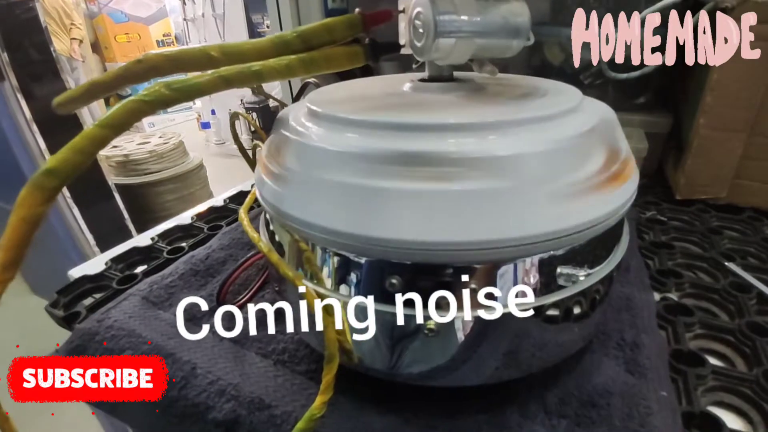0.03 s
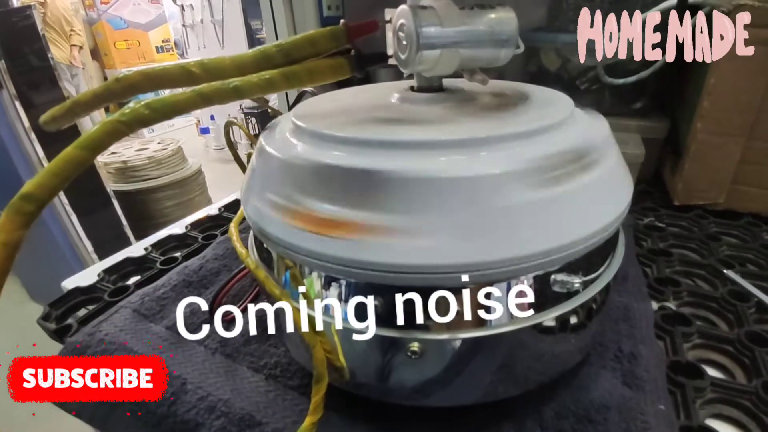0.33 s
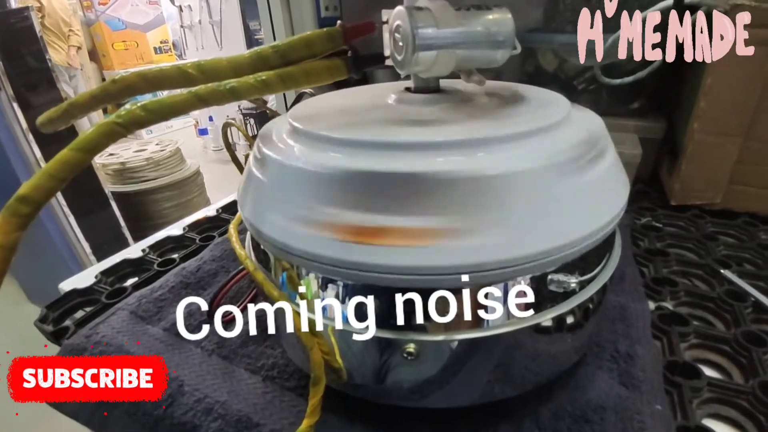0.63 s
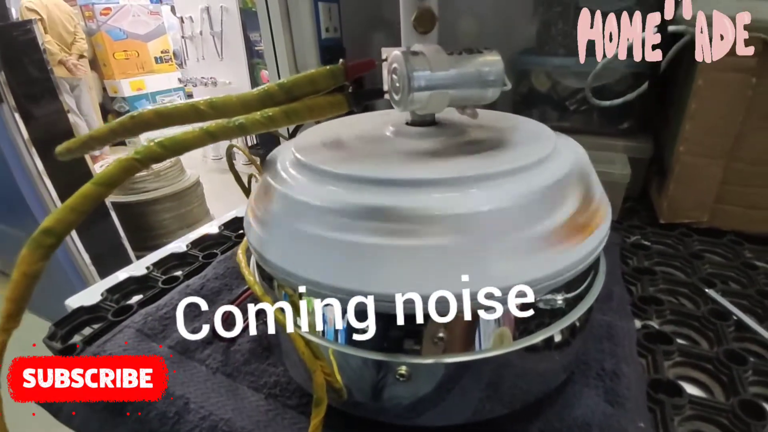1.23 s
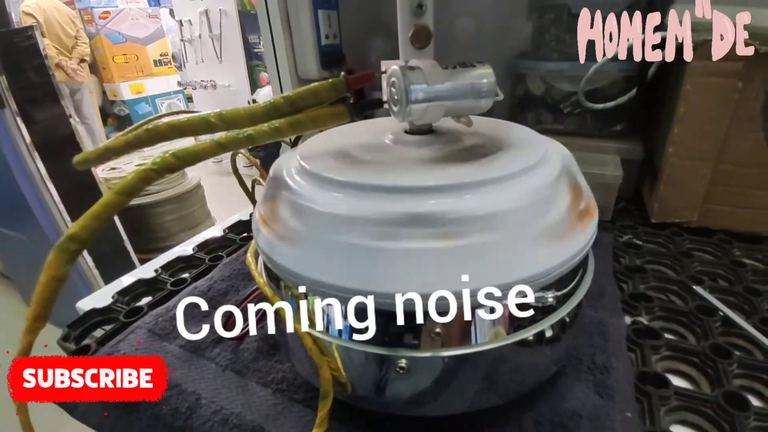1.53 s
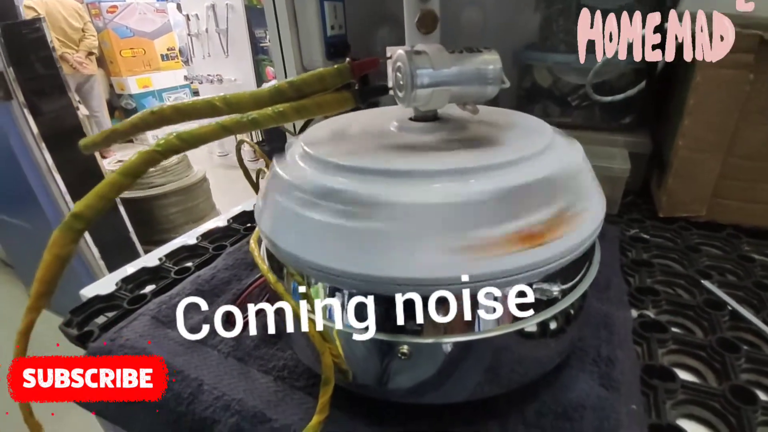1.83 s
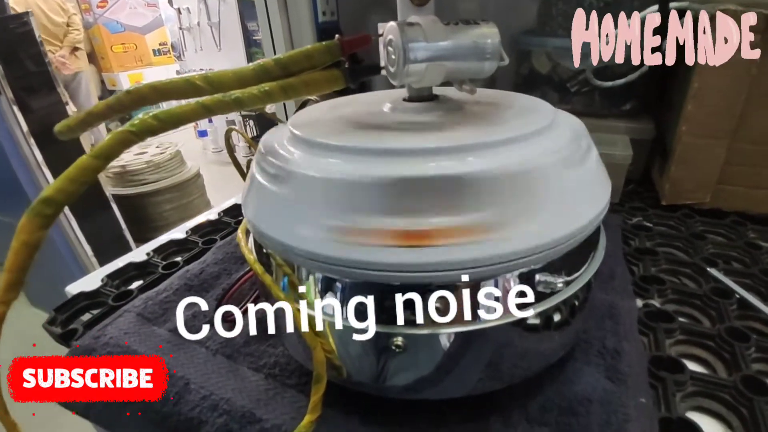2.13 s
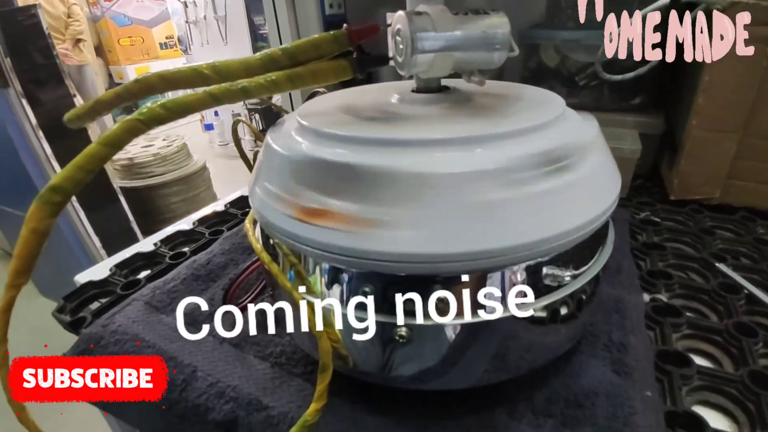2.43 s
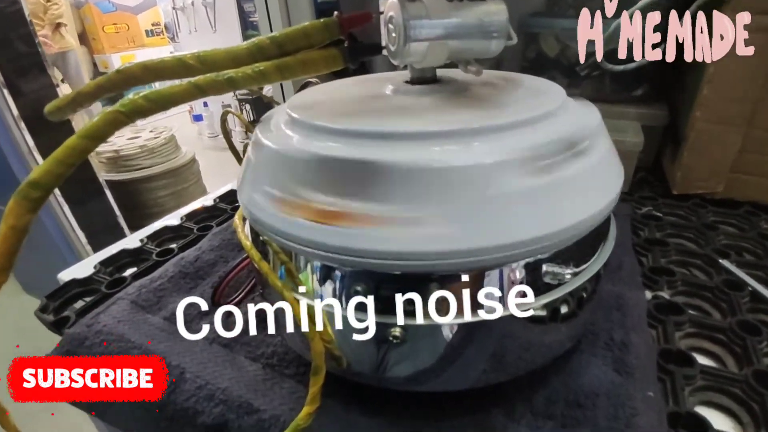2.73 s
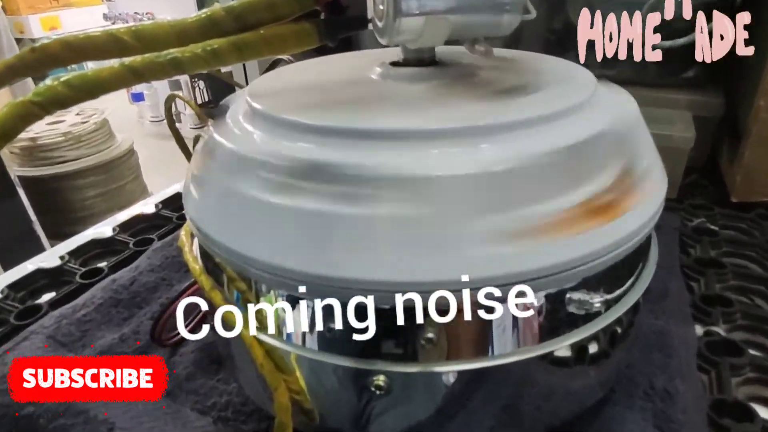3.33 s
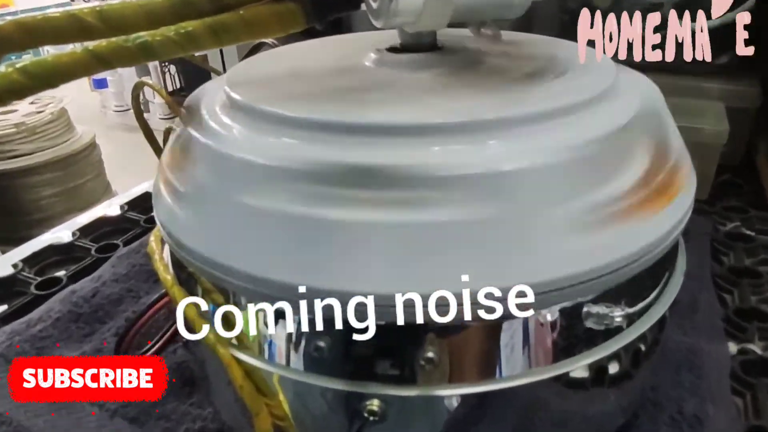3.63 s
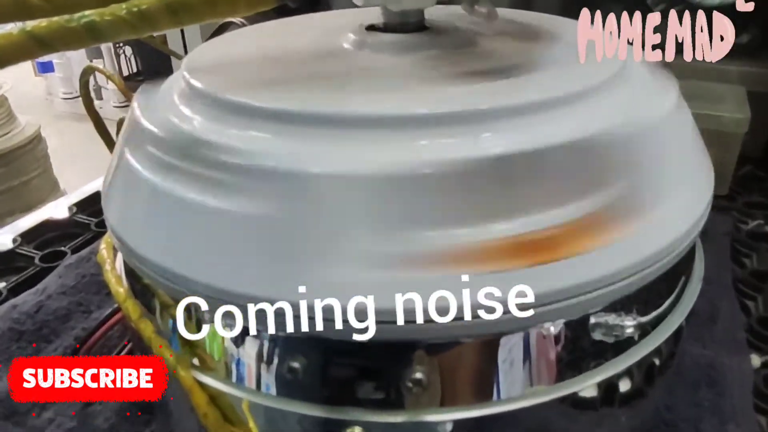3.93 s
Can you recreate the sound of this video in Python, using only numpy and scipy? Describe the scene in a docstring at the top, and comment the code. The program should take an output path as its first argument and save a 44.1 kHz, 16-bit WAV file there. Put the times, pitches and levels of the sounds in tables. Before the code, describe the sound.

A spinning ceiling fan motor rubs with a rough, regularly pulsing metallic rasp.

```python
"""A bare ceiling fan motor on a workshop bench, close to a stereo microphone, at about seven turns a second.
From the start the motor drones over faint room noise. Each turn opens as the warped rotor ticks against
the stator; it then drags over the same rough patch, a rasp that rings in the metal housing, growls below,
squeaks where it grabs and throws off a fine hiss. The rotor skids as it lets go, a loose part rattles on,
and the small room answers before the next turn."""
import sys
import numpy as np
from scipy import signal
from scipy.fft import rfft, irfft
from scipy.io import wavfile
from scipy.ndimage import uniform_filter1d, map_coordinates

SR = 44100
rng = np.random.default_rng(int(sys.argv[2]) if len(sys.argv) > 2 else 0)


def wav_out(sig):
    """Save sig, one row per channel (or a flat mono array), as 16-bit PCM at SR to the path in sys.argv[1]."""
    wavfile.write(sys.argv[1], SR, np.round(np.clip(np.atleast_2d(sig).T, -1, 1) * 32767).astype(np.int16))


N = 176400
TIME = np.arange(N) / SR
TURN_S, FIRST_TURN_S = .14391, .1192
TURN_SIZE = round(TURN_S * SR)
TURN_TIME = np.arange(TURN_SIZE) / SR
GRIT_PER_S, BITE_PER_S = 900, 90   # the friction catches and slips; the contact bites unevenly


def from_db(db):
    """Decibels to gain."""
    return 10 ** (np.asarray(db) / 20)


def rms_one(x):
    """Scale to rms 1."""
    return x / np.sqrt(np.mean(x ** 2) + 1e-20)


def curve(rows, at):
    """Straight lines between the rows."""
    return np.interp(at, *np.transpose(rows))


def at_hz(rows, hz):
    """Straight lines on a log-frequency axis."""
    row_hz, value = np.transpose(rows)
    return np.interp(np.log(hz + 1), np.log(row_hz), value)


def sides(pan_db):
    """A left-right difference as dB for each channel."""
    return pan_db * np.array([[.5], [-.5]])


def drift(per_s, at):
    """A random wander of spread about 1, read at the given times."""
    return np.interp(at * per_s, np.arange(8192), rng.standard_normal(8192))


def flicker(spread_db, per_s):
    """A gain that wanders around 1."""
    return from_db(spread_db * drift(per_s, TIME))


def swell(turn_s, centre_s, half_s):
    """A smooth rise and fall around one moment of the turn."""
    return np.cos(np.pi / 2 * np.clip((turn_s - centre_s) / half_s, -1, 1)) ** 2


def resonance(centre_hz, width_hz):
    """A single peak with steep flanks, as a function from Hz to dB."""
    return lambda hz: -20 * np.log10(1 + ((hz - centre_hz) / width_hz) ** 2)


# How alike the microphone's two sides are. Each row: frequency in Hz, correlation from -1 to 1.
STEREO_LIKENESS = [(100, 0.98), (390, 1), (560, -0.098), (800, 0.66), (1000, -0.78), (1200, 0.19),
                   (1500, 0.19), (2050, 0.38), (2500, -0.38), (3300, 0.61), (5000, -0.13), (15000, 0.21)]
def colour(pair, db_at):
    """Mix two unrelated signals to stereo, filter them by db_at(hz) and scale to rms 1."""
    hz = np.arange(N + 1) * SR / (2 * N)
    mid, side = rfft(pair, 2 * N)
    alike = np.clip(at_hz(STEREO_LIKENESS, hz), -1, 1)
    stereo = np.sqrt(1 + alike) * mid + np.sqrt(1 - alike) * side * [[1], [-1]]
    cepstrum = irfft(np.log(from_db(db_at(hz))))
    cepstrum[..., 1:N] *= 2   # folded to minimum phase, so ringing follows its cause
    cepstrum[..., N + 1:] = 0
    return rms_one(irfft(stereo * np.exp(rfft(cepstrum)))[:, :N])


def rough_patch(force):
    """One turn of roughness: noise evened out in spectrum, then in time, to follow the force."""
    patch = rng.standard_normal((2, TURN_SIZE)) * force
    for _ in range(5):
        spectrum = rfft(patch)
        bin_power = uniform_filter1d(abs(spectrum) ** 2, size=3)
        patch = irfft(spectrum / np.sqrt(bin_power + 1e-12), TURN_SIZE) / force
        local_power = uniform_filter1d(patch ** 2, size=128, mode="wrap")
        patch *= force / np.sqrt(local_power + 1e-12)
    return patch


def friction(levels, turn_s, fresh_share):
    """The same patch passes on every turn; fresh_share of the power is grit that never repeats."""
    patch = rough_patch(from_db(curve(levels, TURN_TIME)))
    same = np.array([map_coordinates(row, [turn_s * SR], order=3, mode="grid-wrap") for row in patch])
    grit = rms_one(rng.standard_normal((2, N)) * flicker(3, GRIT_PER_S))
    fresh = grit * from_db(curve(levels, turn_s))
    return np.sqrt(1 - fresh_share) * same + np.sqrt(fresh_share) * fresh


# The workshop's background, all around the bench. Each row: frequency in Hz, relative level in dB.
ROOM_NOISE_SPECTRUM = [(15, 8), (26, 4), (40, -16), (100, -25), (400, -15), (2000, -24), (8000, -33),
                       (16000, -53)]
def room_noise():
    """Faint steady noise, mostly deep rumble."""
    return from_db(-57.5) * colour(rng.standard_normal((2, N)), lambda hz: at_hz(ROOM_NOISE_SPECTRUM, hz))


def workshop_reverb(motor, delay_s=.004, mid_t60_s=.19, treble_t60_s=.066, low_hz=460, split_hz=5600):
    """The near walls send back a short diffuse tail whose treble dies first."""
    t = np.arange(SR // 2) / SR
    white = rng.standard_normal((2, len(t)))
    mids = signal.sosfilt(signal.butter(2, [low_hz, split_hz], "band", fs=SR, output="sos"), white)
    treble = signal.sosfilt(signal.butter(2, split_hz, "high", fs=SR, output="sos"), white)
    tail = (mids * 1e-3 ** (t / mid_t60_s) - treble * 1e-3 ** (t / treble_t60_s)) * (t > delay_s)
    return from_db(-13) * signal.fftconvolve(motor, rms_one(tail) / np.sqrt(len(t)), axes=1)[:, :N]


def drone(turn_s):
    """Down at the bench, the running motor keeps its mount booming faintly all through the turn."""
    shake = friction([(0, 0)], turn_s, fresh_share=.51)
    return from_db(-51.5) * colour(shake, resonance(centre_hz=152.2, width_hz=18.5))


# The loose part's chatter. Each row: seconds into the turn, relative level in dB.
RATTLE_LEVELS = [(0, -4), (.018, -9.5), (.080, 2.5), (.088, -0.5), (.098, -5.5), (.114, -1), (.128, -25),
                 (.143, -11)]
def rattle(turn_s):
    """A loose part chatters on after the rub."""
    chatter = friction(RATTLE_LEVELS, turn_s, fresh_share=.27)
    return from_db(-39.5) * colour(chatter, resonance(centre_hz=903, width_hz=267))


# The housing's resonances at the microphone.
# Each row: frequency in Hz, width in Hz, lift in dB, left over right in dB.
HOUSING_MODES = [(261, 14, 10, -9.5), (295.6, 24, 10, 4.5), (367, 24, 14.5, 2.5), (439.7, 25, 12, -2.5),
                 (489, 23, 7, -4.5), (698, 23, 8.5, -1), (1151.6, 62, 5, 1), (1230, 117, 6.5, -5),
                 (1768, 17, 8, -10), (1929, 120, 10, -8), (2216, 120, 5, 8), (2480, 88, 3.5, -5),
                 (2835, 25, 5, -5), (3187, 154, 8, 3), (3523, 400, 9, -3.5), (3980, 90, 6.5, 9),
                 (4790, 94, 9, -9.5), (5078, 146, 11.5, -1.5), (6230, 103, 7, -2), (7880, 380, 9, -2.5),
                 (9370, 360, 9, -1), (11770, 250, 10, -6), (13260, 250, 13, -12)]
def housing(shake, spectrum):
    """The metal housing rings, adding its peaks to a broad spectrum."""
    def db_at(hz):
        lift_db = sum((db + sides(pan_db)) / (1 + (2 * (hz - mode_hz) / width_hz) ** 2)
                      for mode_hz, width_hz, db, pan_db in HOUSING_MODES)
        return at_hz(spectrum, hz) + lift_db
    return colour(shake, db_at)


# The jolt to the motor's body. Each row: seconds into the turn, relative level in dB.
GROWL_LEVELS = [(0, -6), (.003, -1), (.014, -3), (.028, 1), (.066, -2.5), (.078, -12.5), (.105, -14.5),
                (.143, -22.5)]
# Its low tone from close by. Each row: frequency in Hz, relative level in dB.
GROWL_SPECTRUM = [(20, -44), (90, -39.5), (140, -11.5), (195, -12), (250, 1), (400, -2.5), (490, -2.5),
                  (600, -11.5), (900, -33.5), (3000, -35.5)]
def growl(turn_s):
    """The contact jolts the whole motor, which answers with its lowest resonances."""
    jolt = friction(GROWL_LEVELS, turn_s, fresh_share=.16)
    return from_db(-34.5) * housing(jolt, GROWL_SPECTRUM)


def skid(turn_s):
    """The rotor lets go with a brief bright scuff, harder on some turns than on others."""
    scuff = rng.standard_normal((2, N)) * swell(turn_s, centre_s=.0868, half_s=.014)
    scuff *= flicker(spread_db=2, per_s=7.09)
    return from_db(-40) * colour(scuff, resonance(centre_hz=5500, width_hz=810))


# The fine grit at the contact. Each row: seconds into the turn, relative level in dB.
HISS_LEVELS = [(0, -15), (.0033, 1), (.0042, 4), (.009, -7), (.016, -5.5), (.028, 2.5), (.031, 5),
               (.042, 1), (.086, -5.5), (.093, -12), (.105, -12.5), (.118, -17.5), (.143, -24)]
# Its bright tone from close by. Each row: frequency in Hz, relative level in dB.
HISS_SPECTRUM = [(20, -40), (1500, -15), (4000, -4.5), (7000, 1), (9500, -6.5), (10700, -6.5),
                 (12000, -9.5), (14000, -28), (15500, -57)]
def hiss(turn_s):
    """The finest grit hisses a little right of centre, differently on each turn."""
    grit = friction(HISS_LEVELS, turn_s, fresh_share=.6) * flicker(1.75, BITE_PER_S)
    return from_db(-32.5 + sides(pan_db=-2)) * housing(grit, HISS_SPECTRUM)


# Spots where the metal grabs. Each row: centre in seconds into the turn, half length in seconds,
# pitch in Hz, level in dB, left over right in dB.
GRAB_SPOTS = [(.008, 0.0075, 1140, -27.5, 7), (0.022, 0.016, 1159, -25, -7),
              (0.042, 0.022, 1220, -34.5, -5), (0.032, .012, 2030, -20.5, -8),
              (0.037, 0.016, 3400, -22, 10), (0.0649, 0.018, 2090, -26.5, -13.5),
              (0.066, 0.0056, 3490, -18, 15.5), (.077, 0.015, 1965, -28.5, -11.5),
              (0.079, 0.007, 1270, -28, -10), (0.084, 0.0066, 4200, -26, -5), (0.138, .007, 3480, -66, -5)]
def squeaks(turn_s, waver_hz=49.5):
    """The metal grabs at the same spots on every turn and gives short wavering tones."""
    out = 0
    for centre_s, half_s, hz, db, pan_db in GRAB_SPOTS:
        pitch_hz = hz + waver_hz * drift(301.2, TURN_TIME)
        cycles = np.cumsum(pitch_hz) / SR + rng.random()
        tone = np.sin(2 * np.pi * np.interp(turn_s, TURN_TIME, cycles)) * swell(turn_s, centre_s, half_s)
        out = out + tone * flicker(spread_db=2.6, per_s=6.86) * from_db(db + sides(pan_db))
    return out


# The rotor pressing on the stator. Each row: seconds into the turn, relative pressure in dB.
CONTACT_PRESSURE = [(0, -31), (.003, -14), (.004, -3), (.011, -5), (.015, -12), (.020, -6.5), (.027, -1),
                    (.036, 3), (.046, -1), (.058, -2.5), (.066, 1.5), (.078, 0), (.083, -13), (.094, -18.5),
                    (.108, -16.5), (.120, -24.5), (.143, -25)]
# The rub's broad tone from close by. Each row: frequency in Hz, relative level in dB.
RASP_SPECTRUM = [(20, -54), (250, -34), (450, -23), (600, -15.5), (750, -11.5), (950, -4), (1400, -3.5),
                 (1700, -4), (2200, -5.5), (2600, -6), (3300, -4.5), (4500, -10), (6000, -15),
                 (9000, -23.5), (15000, -46.5)]
def rasp(turn_s):
    """In the foreground the warped rotor ticks against the stator, drags over it and shakes the housing."""
    rub = friction(CONTACT_PRESSURE, turn_s, fresh_share=.36) * flicker(.6, BITE_PER_S)
    return from_db(-23.5) * housing(rub, RASP_SPECTRUM)


# Slight changes in the microphone's distance from the motor. Each row: time in seconds, gain in dB.
MIC_NEARNESS = [(0, -1), (.7, -0.4), (1.8, -1.5), (2.8, -0.8), (4, -1.06)]
def scene():
    """The rubbing motor as heard from beside the bench, with the workshop behind it."""
    wobble_s = .000012 * drift(24.64, TIME)   # the rotation is slightly uneven
    turn_s = (TIME - FIRST_TURN_S + wobble_s) % TURN_S   # seconds into the current turn
    motor = sum(source(turn_s) for source in (rasp, growl, drone, rattle, skid, hiss, squeaks))
    motor *= from_db(curve(MIC_NEARNESS, TIME))
    return room_noise() + motor + workshop_reverb(motor)


def record(dry):
    """A steep low-pass after the microphone cuts the highest treble."""
    stop_db, stop_hz = 70, 16500
    return signal.sosfilt(signal.cheby2(12, stop_db, stop_hz, fs=SR, output="sos"), dry)


dry = scene()
out = record(dry)
wav_out(out)
```